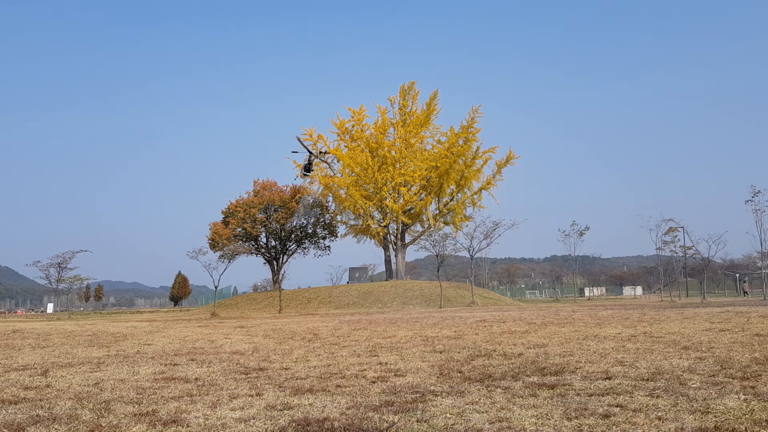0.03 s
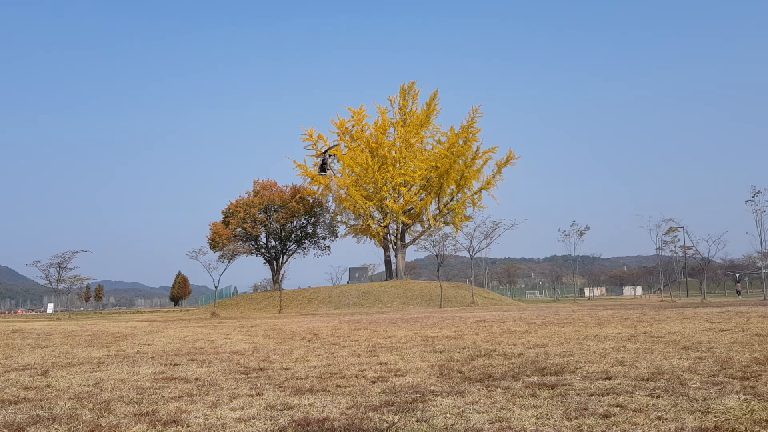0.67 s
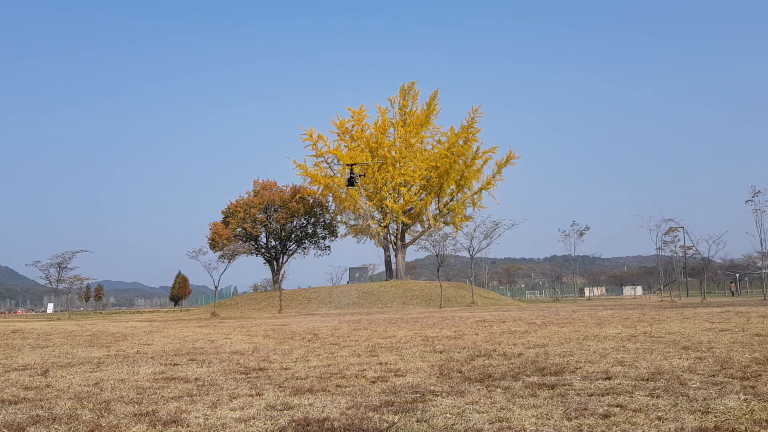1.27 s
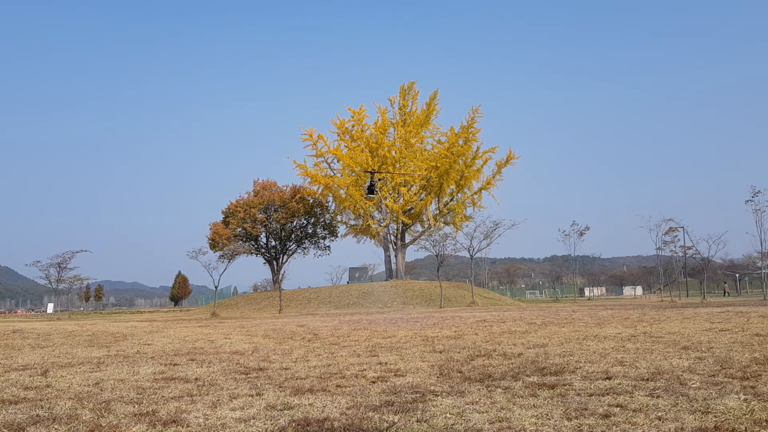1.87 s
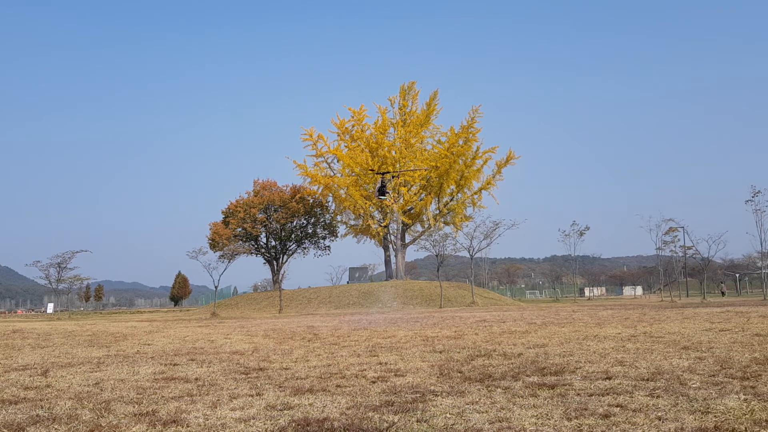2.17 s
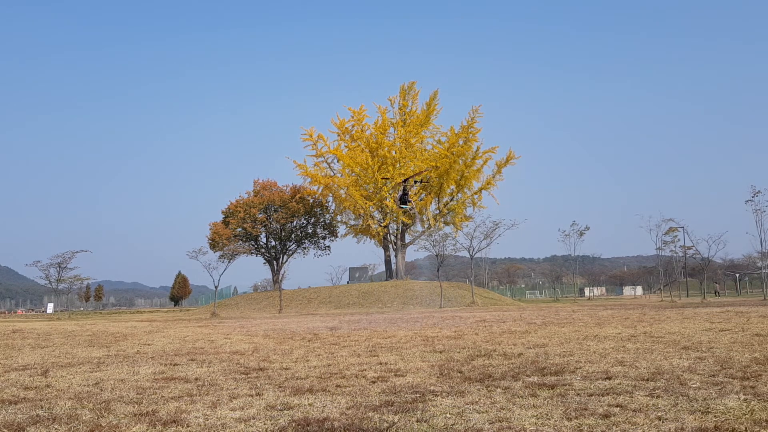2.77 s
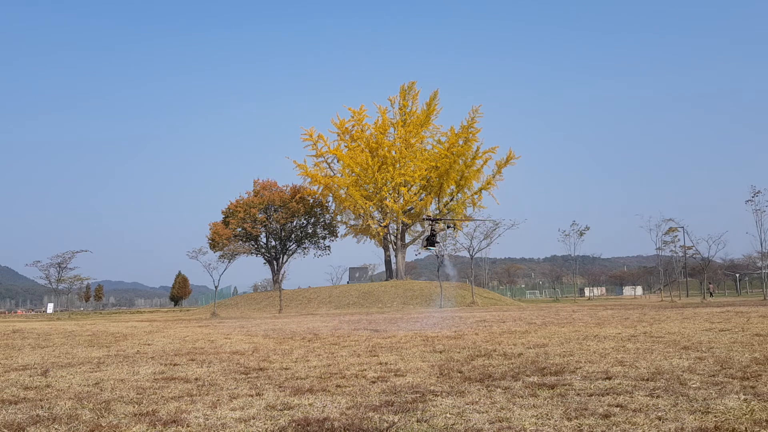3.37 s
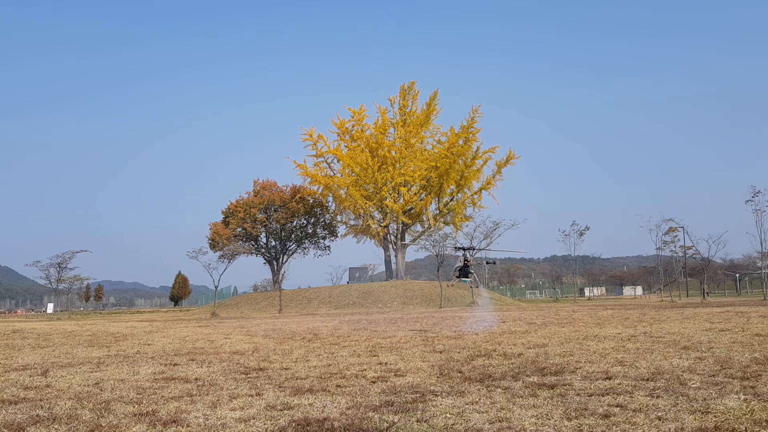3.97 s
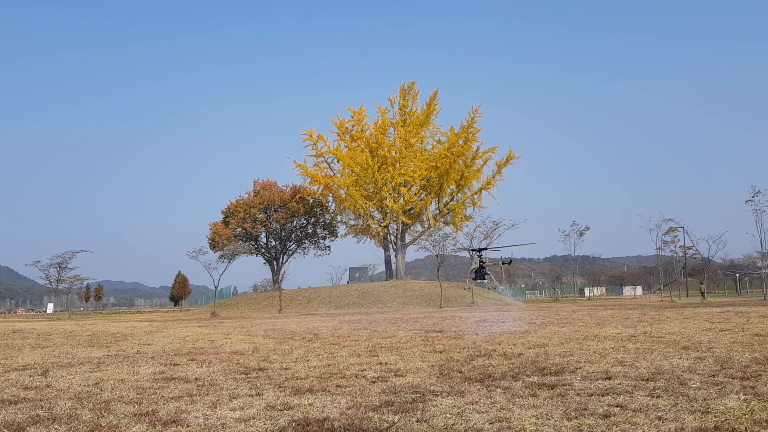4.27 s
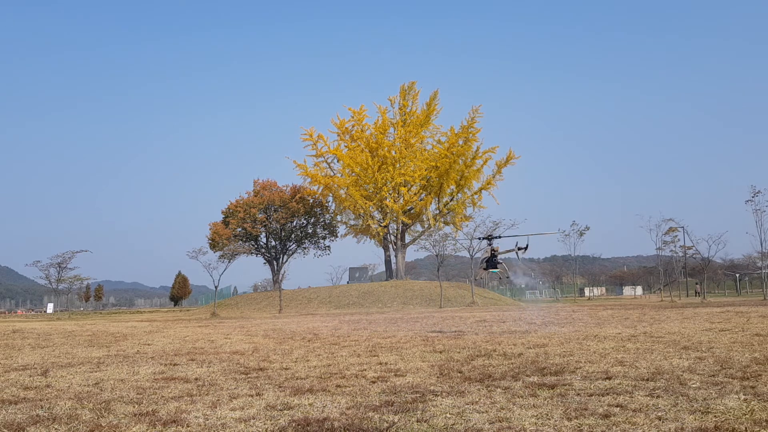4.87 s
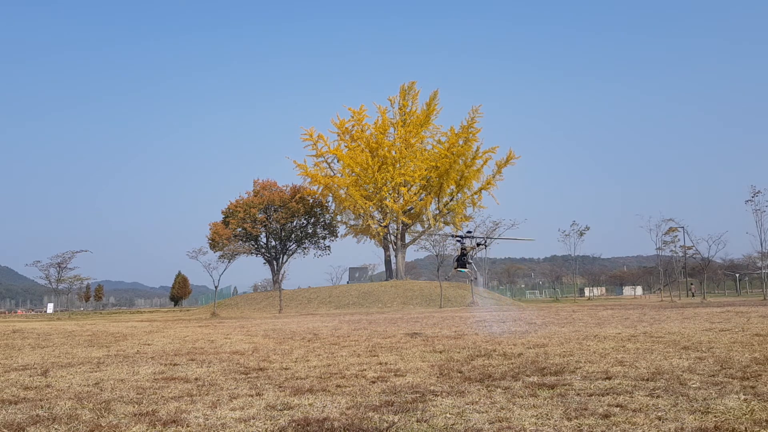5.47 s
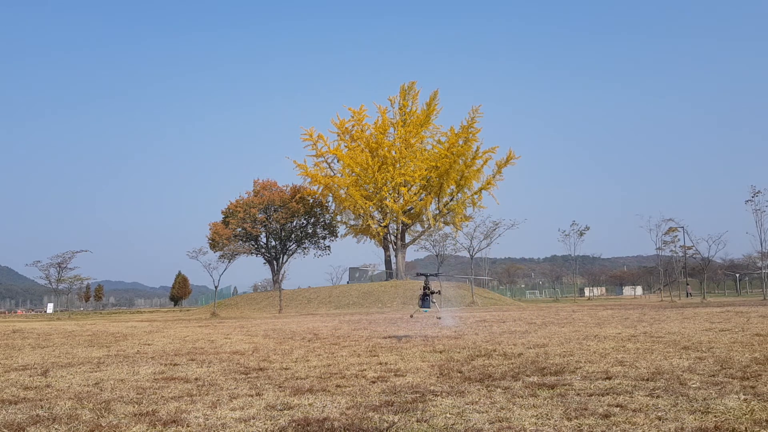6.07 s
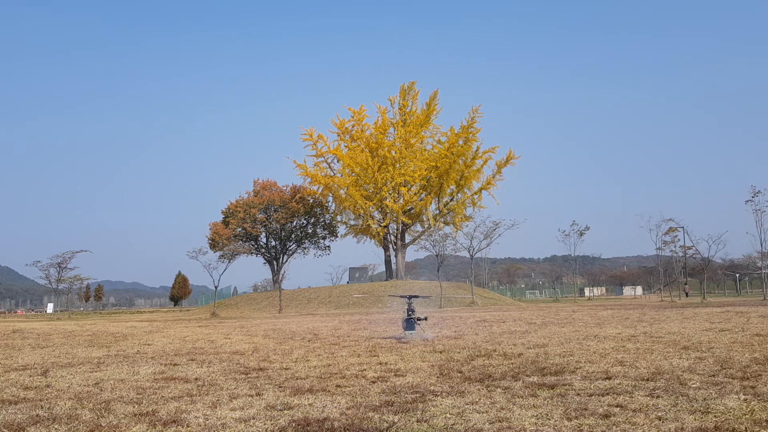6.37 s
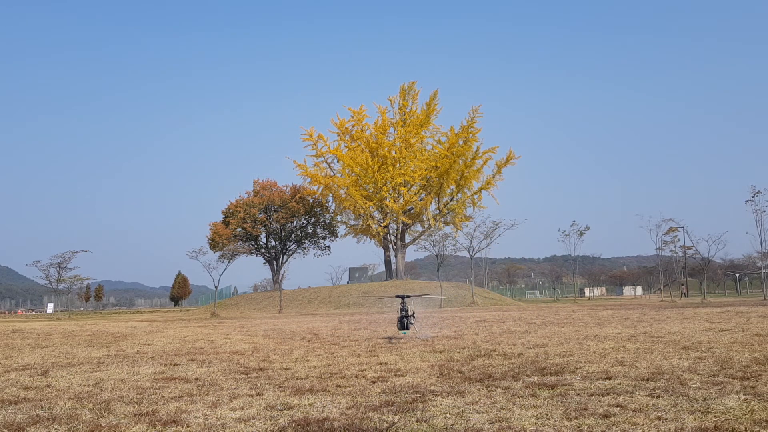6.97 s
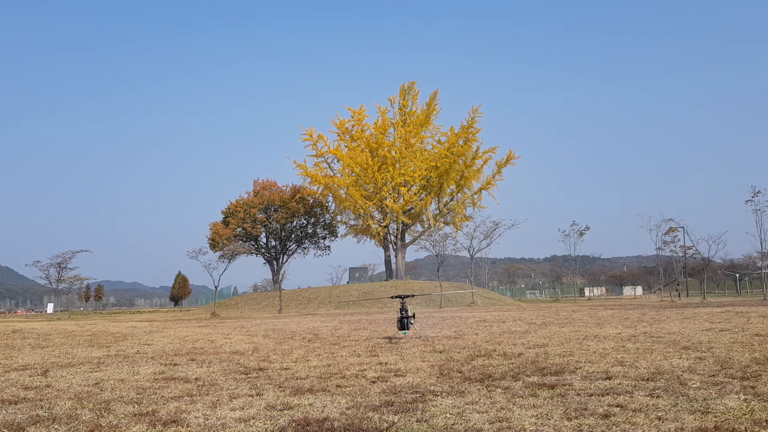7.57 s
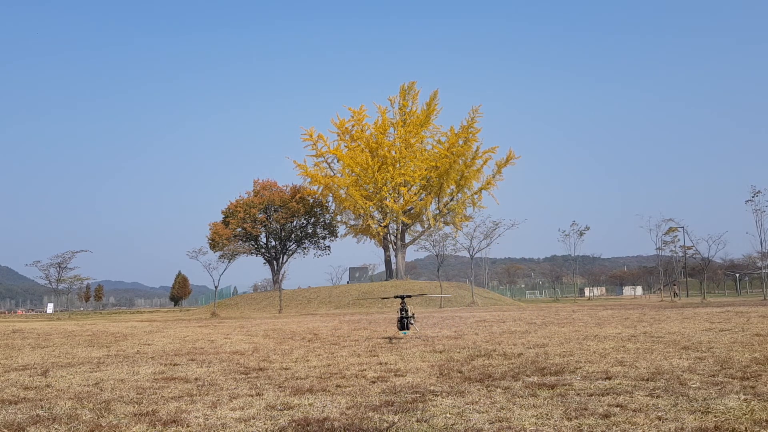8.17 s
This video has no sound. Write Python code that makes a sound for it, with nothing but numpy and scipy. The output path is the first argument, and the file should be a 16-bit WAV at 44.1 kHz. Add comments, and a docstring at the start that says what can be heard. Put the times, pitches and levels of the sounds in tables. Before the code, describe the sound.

The raspy engine drone and whirring rotors of a model helicopter hovering low, turning quieter and lower as it lands.

```python
"""A model helicopter landing on grass.

A small two-stroke helicopter hovers, sinks, lands and throttles down. Its exhaust is a pulse train
that hums and rasps through the muffler, every second firing weaker; rotors and gears are locked to
the crank. The ground echo shifts with height, and sideways drift moves the sound between two
microphones. Light air rumbles, and midway a soft knock rings the case that holds the microphones."""
import sys
import numpy as np
from scipy import signal
from scipy.fft import rfft, irfft, next_fast_len
from scipy.io import wavfile
from scipy.ndimage import map_coordinates

SR = 44100
rng = np.random.default_rng(int(sys.argv[2]) if len(sys.argv) > 2 else 0)


def unload_audio(sound):
    """Save the sound as a 16-bit wav file, at the path given as the first command line argument."""
    columns = np.transpose(np.atleast_2d(sound))
    # keep every value between -1 and 1, then stretch to whole-number steps
    steps = np.round(np.clip(columns, -1, 1) * 32767)
    wavfile.write(sys.argv[1], SR, steps.astype(np.int16))


N = 362061

# Loudness of the high hiss. Each row: time in seconds, level in dB.
HISS_LEVEL = [(0, -40), (.7, -43.5), (1.15, -42.5), (2.75, -38), (3.5, -43.5), (4.15, -39.5), (4.7, -37.5),
              (5.3, -39.5), (5.8, -42.5), (6.15, -43.5), (6.55, -40), (7.5, -42.5), (7.8, -38.5), (8, -41),
              (8.21, -40.5)]
# After touchdown the throttle eases, the blades flatten, the engine idles: start and length in seconds.
THROTTLE_BACK, BLADES_FLATTEN, THROTTLE_IDLE = (6.43, .3), (6.55, .6), (7.75, .4)
MAIN_PASSES_PER_TURN, TAIL_PASSES_PER_TURN = .2035, .947  # blade passes per crank turn


def amp(db):
    """Decibels as an amplitude ratio."""
    return 10 ** (np.asarray(db) / 20)

def unit(x):
    """Normalisation to rms 1."""
    return x / np.sqrt(np.mean(x ** 2) + 1e-20)

def along(points, hz):
    """Interpolation of (Hz, value) points on a logarithmic frequency axis."""
    f, v = np.transpose(points)
    return np.interp(np.log(hz + 1), np.log(f + 1), v)

def curves(rows):
    """Linear interpolation in time: one curve for each column after the seconds."""
    s, *cols = np.transpose(rows)
    return [np.interp(np.arange(N) / SR, s, c) for c in cols]

def ramp(start, length):
    """A linear rise from 0 to 1 over length seconds."""
    return np.clip((np.arange(N) / SR - start) / length, 0, 1)

def bell(middle, half):
    """A Gaussian swell from 0 to 1 and back."""
    return np.exp(-((np.arange(N) / SR - middle) / half) ** 2)

def wobble(rate, steps=8):
    """Smooth random modulation: a spline through rate knots a second."""
    knots = rng.standard_normal(int(N * rate / SR) + 4)
    fine = np.arange(len(knots) * steps) / steps
    return np.interp(np.arange(N) * (rate / SR), fine, map_coordinates(knots, [fine], mode="mirror"))

def filtered(x, response):
    """Linear filtering: the spectrum of x times a frequency response."""
    m = next_fast_len(N + SR // 4)
    return irfft(rfft(x, m) * response(np.fft.rfftfreq(m, 1 / SR)), m)[..., :N]

def coloured(x, points, size=4096):
    """Minimum-phase filtering by a (Hz, dB) response; the result has rms 1."""
    cepstrum = irfft(np.log(amp(along(points, np.fft.rfftfreq(size, 1 / SR)))))
    cepstrum[1:size // 2] *= 2
    cepstrum[size // 2 + 1:] = 0
    return unit(signal.oaconvolve(x, irfft(np.exp(rfft(cepstrum))))[:N])

def pulses(at, sizes):
    """Band-limited impulses: windowed sincs at fractional sample positions."""
    taps = np.floor(at)[:, None] + np.arange(-7, 9)
    offset = taps - at[:, None]
    clicks = np.sinc(offset) * np.sinc(offset / 8) * sizes[:, None]
    return np.bincount(np.clip(taps, 0, N).astype(int).ravel(), clicks.ravel(), N + 1)[:N]

def delayed(x, ms):
    """A time-varying propagation delay."""
    return map_coordinates(x, [np.arange(N) - ms * SR / 1000], order=3)

def puffs(cycles, depth, sharp):
    """Amplitude modulation: white noise that swells once a cycle."""
    swell = (.5 + .5 * np.cos(2 * np.pi * cycles)) ** sharp
    return unit(rng.standard_normal(N) * (1 + depth * swell))

def aspects(height, below_m=3.13, side_m=1.4, skim_m=1.3, ground_m=.18):
    """Directivity: weights for the craft heard from below, from the side and landed; they sum to 1."""
    below = np.clip((height - side_m) / (below_m - side_m), 0, 1)
    landed = np.clip((skim_m - height) / (skim_m - ground_m), 0, 1)
    return np.array([below, 1 - below - landed, landed])

def firing_pairs(turns):
    """Period doubling: a phase that is whole at each strong firing and slips a turn at random."""
    # Slips of the strong-weak pattern. Each row: time in seconds, mean slips per second.
    slip_rate = [(0, 11), (1.1, 9), (1.6, 2), (4.3, 3), (5.1, 18)]
    slips_per_s, = curves(slip_rate)
    return (turns + np.cumsum(rng.random(N) < slips_per_s / SR)) / 2

def muffler(cracks, rings, bounce, split_hz, round_trips_ms=(.504, 1.211)):
    """All-pass dispersion: two chambers smear the cracks (below split_hz) and rings (above) in time."""
    def chambers(hz):
        trips = np.exp(-2j * np.pi * np.outer(round_trips_ms, hz) / 1000)
        shares = bounce * np.array([[.5], [1]])
        return np.prod((1 - shares / trips) / (1 - shares * trips), axis=0)
    treble = lambda hz: .5 + .5 * np.tanh((hz - split_hz) / 70)
    return filtered(cracks + filtered(rings - cracks, treble), chambers)

def exhaust(turns, pairs, aspect, crack_scatter=.13, ring_scatter=.15):
    """Source and filter: each firing is a crack, a thud and a ring; rich running makes them alternate."""
    # Spectra of the rasp in each aspect, and of the thud. Each row: frequency in Hz, relative dB.
    from_below = [(900, -53.5), (1250, 3.5), (1400, 4), (1500, 6.5), (1780, 4), (2150, 0), (2500, -4),
                  (2850, 2.5), (3120, 0.5), (3450, -3.5), (3850, -3.5), (4150, -12.5), (4550, -10.5),
                  (5000, -8), (5600, -13), (7400, -15.5), (10000, -22.5), (13000, -29), (15500, -44)]
    from_side = [(900, -38), (1300, -34.5), (1500, -3.5), (1780, -3.5), (2270, 4), (2500, 1), (2750, 0.5),
                 (3050, 4), (3550, -5), (3850, -6.5), (4200, -18), (5300, -18.5), (7500, -18), (10000, -44)]
    when_landed = [(900, -35), (1080, 15), (1220, 0.5), (1440, 11.5), (1570, 5), (1750, 11.5), (1980, 7),
                   (2220, 3), (2400, 6.5), (2600, -2), (2950, 5.5), (3450, -2), (4100, 1.5), (5000, 2.5),
                   (10000, -35)]
    thud_spectrum = [(40, -32), (90, -3), (125, 5.5), (200, -9), (375, 7.5), (520, -18), (640, -4),
                     (780, -28), (880, -4), (1130, -4), (1400, -28), (3000, -21), (6500, -32),
                     (13000, -31.5)]
    # Loudness of the rasp. Each row: time in seconds, level in dB.
    rasp_level = [(0.1, -26.5), (.7, -26.8), (1.28, -28), (2.1, -26.5), (2.73, -24.5), (3.6, -25),
                  (4.3, -25.5), (4.94, -26), (5.18, -22.5), (5.74, -26), (5.98, -28.5), (6.23, -37.5),
                  (7.07, -45), (7.3, -42.5), (8.1, -42)]
    # Each triple: from below, from the side, landed.
    crack_limps, ring_limps, gas_shares = (.3, .1, .04), (.42, .33, .06), (.27, .15, .08)
    bounces, splits_hz, thuds_db = (.3, .3, .5), (2780, 2660, 2600), (-40, -35, -39)
    jitter_ms, sway_ms, late_ms_per_limp, crack_lead_ms, ring_lag_ms = .008, .024, .07, 1.7, .15

    at = np.interp(np.arange(1, int(turns[-1])), turns, np.arange(N))
    sample = at.astype(int)
    size_draw, time_draw = rng.standard_normal((len(at), 2)).T
    beat = np.cos(2 * np.pi * pairs[sample])  # +1 strong, -1 weak
    crack_limp, ring_limp = np.dot([crack_limps, ring_limps], aspect[:, sample])
    uneven = ring_limp * beat + ring_scatter * size_draw
    # Weak firings ignite late, and the crank sways under load.
    late_ms = jitter_ms * time_draw - late_ms_per_limp * crack_limp * beat + sway_ms * wobble(85)[sample]
    at = at + late_ms * SR / 1000
    cracks = pulses(at - crack_lead_ms * SR / 1000, 1 + crack_limp * beat + crack_scatter * size_draw)
    rings = pulses(at + ring_lag_ms * SR / 1000, 1 + uneven)
    gas = np.dot(gas_shares, aspect) * puffs(pairs, depth=.15, sharp=2.2)
    rasp, spectra = 0, (from_below, from_side, when_landed)
    for share, bounce, split_hz, spectrum in zip(aspect, bounces, splits_hz, spectra):
        rasp += share * coloured(unit(muffler(cracks, rings, bounce, split_hz)) + gas, spectrum)
    kicks = pulses(at, uneven / np.hypot(ring_limp, ring_scatter))
    thud = -unit(filtered(kicks, lambda hz: amp(along(thud_spectrum, hz))))
    thud_db = np.dot(thuds_db, aspect) - 13 * ramp(*THROTTLE_BACK)
    rasp_db, = curves(rasp_level)
    return amp(thud_db) * thud + amp(rasp_db) * rasp

def hum(turns, aspect, waver_db=.43, drift_db=.5, hunting_db=2.4):
    """Harmonics of the firing rate leave the muffler; the overtones falter as the throttle comes back."""
    # Each row: crank order, then level in dB from below, from the side, landed, throttled back, idling.
    harmonics = [(1, -34, -30.5, -31, -33, -40), (2, -35, -30.5, -28, -42, -46.5),
                 (3, -59, -46, -44, -43, -50), (4, -41.5, -32.5, -34, -48, -64),
                 (5, -53.5, -43, -41, -55, -50)]
    # Engine stumbles. Each row: middle in seconds, half length in seconds, overtone change in dB.
    stumbles = [(6.435, .022, -11), (6.705, .018, -8)]
    back, idle = ramp(*THROTTLE_BACK), ramp(*THROTTLE_IDLE)
    states = np.array([*(aspect * (1 - back)), back - idle, idle])
    stumble_db = sum(db * bell(s, half) for s, half, db in stumbles)
    tones = 0
    for order, *levels in harmonics:
        falter_db = (stumble_db + hunting_db * back * wobble(35)) * (order > 1)
        level_db = np.dot(levels, states) + falter_db + waver_db * wobble(25) + drift_db * wobble(1.73)
        tones -= amp(level_db) * np.cos(2 * np.pi * order * turns)
    return np.sqrt(2) * tones

def rotors(turns, waver_db=.65, flattened_db=-3.5):
    """Periodic blade loading radiates harmonics of the passing rate, weaker once the blades flatten."""
    # Rotor tones. Each row: multiple of that rotor's blade passing rate, level in dB.
    main_tones = [(1, -47), (2, -50.5), (3, -54.5), (4, -71), (6, -49.5), (7, -48.5)]
    tail_tones = [(1, -42.5), (2, -49.5), (3, -67), (4, -75)]
    tones = 0
    for ratio, lines in (MAIN_PASSES_PER_TURN, main_tones), (TAIL_PASSES_PER_TURN, tail_tones):
        for k, db in lines:
            tones += amp(db + waver_db * wobble(12)) * np.sin(2 * np.pi * k * ratio * turns)
    return np.sqrt(2) * amp(flattened_db * ramp(*BLADES_FLATTEN)) * tones

def downwash(turns, height, landed, db_per_m=-.12):
    """Turbulence: the main blades chop the air into a wash, and their tips swish while loaded."""
    # Spectra of wash and tip swish. Each row: frequency in Hz, relative level in dB.
    wash_spectrum = [(20, -50), (45, -1.5), (70, -1), (130, -5), (190, -6), (340, -5), (560, -3),
                     (680, -10), (1000, -8), (1350, -14.5), (3000, -46), (8000, -80)]
    swish_spectrum = [(400, -28), (900, -8), (1350, -9), (3000, -6.5), (8000, -42)]
    flattened, passes = ramp(*BLADES_FLATTEN), MAIN_PASSES_PER_TURN * turns
    gust_db = (.8 + 1.3 * landed) * wobble(15)  # air recirculating off the ground gusts harder
    wash = coloured(puffs(passes, depth=.62, sharp=6.2), wash_spectrum)
    swish = coloured(puffs(passes, depth=.33, sharp=3.7), swish_spectrum)
    wash_db, swish_db = -39.5 - 2.8 * flattened + gust_db, -42 - 10 * flattened
    return amp(db_per_m * height) * (amp(wash_db) * wash + amp(swish_db) * swish)

def gear_rattle(turns, pairs, aspect, right, db_per_m=1.17):
    """Modulated noise: the gears rattle with each turn and strong firing, louder toward the right."""
    # Spectrum of the rattle. Each row: frequency in Hz, relative level in dB.
    spectrum = [(1500, -12), (3800, 5), (4500, 2), (5350, 3), (5750, 1), (6300, -1), (6950, -9),
                (7400, -13), (8400, -3.5), (10000, -32), (14000, -20)]
    impacts = puffs(turns, depth=.11, sharp=3.8) + .66 * puffs(pairs, depth=5.6, sharp=10)
    level_db = np.dot((-39.5, -36.7, -45), aspect) + db_per_m * right
    return amp(level_db) * coloured(impacts, spectrum)

def high_hiss(turns, dulling):
    """Modulated noise: a high hiss pulses once a crank turn; its top end sounds duller late on."""
    # Spectra of the hiss. Each row: frequency in Hz, relative level in dB.
    brighter = [(5000, -17), (8000, -2), (9400, -1.5), (10500, 5), (11300, -5.5), (11900, 7.5),
                (13400, 3.5), (14200, -1), (15200, -7), (15800, -13)]
    duller = [(5000, -13), (8000, -5), (9900, 0), (10600, 5), (11000, -2), (11400, 8), (11900, 1),
              (12600, 4), (13500, -1), (14400, -12), (15500, -20)]
    noise = puffs(turns, depth=.88, sharp=2.5)
    hiss_db, = curves(HISS_LEVEL)
    return amp(hiss_db) * ((1 - dulling) * coloured(noise, brighter) + dulling * coloured(noise, duller))

def gear_resonances(pairs):
    """Directional radiation: a sizzle and a narrow ring swell at the times the gears face the listener."""
    # Spectra of the sizzle and the main gear's ring. Each row: frequency in Hz, relative level in dB.
    sizzle = [(5500, -23), (6800, -7), (7400, 0), (7900, -2), (8700, -36), (11000, -40)]
    ring = [(5500, -53), (6150, -13), (6380, 2), (6480, -5), (6620, 2), (6900, -19), (7600, -42)]
    # Their swells. Each row: middle in seconds, half length in seconds, greatest level in dB.
    sizzle_swells = [(1.3, 1, -44), (4.3, 0.36, -34.5)]
    ring_swells = [(1.55, 1.5, -40.5), (3.45, 0.43, -46), (6.35, 0.5, -46.5)]
    bands = 0
    for spectrum, swells in (sizzle, sizzle_swells), (ring, ring_swells):
        envelope = sum(amp(db) * bell(s, half) for s, half, db in swells)
        bands += envelope * coloured(puffs(pairs, depth=.63, sharp=1), spectrum)
    return bands

def whine(turns, flutter_per_order=.65 / 20, waver_db=.5):
    """Gear and fan tones, modulated in phase by backlash and in amplitude by each crank turn."""
    # Each row: crank order, greatest level in dB, start in seconds, end in seconds.
    partials = [(9, -39.5, 3, 5.5), (7, -46, 6.1, 7.4), (9, -48.5, 6.1, 7.7), (12, -43, 6.7, 7.7),
                (6, -48, 6.7, 7.7), (10, -54, 6.4, 7.8), (12, -49, 7.35, 8.6), (13, -49, 7.5, 8.1),
                (16, -51, 7, 8), (17, -52, 6.6, 7.4), (17, -50, 7.6, 8.1), (18, -50, 7, 7.75),
                (18, -44, 7.55, 8.35), (24, -50, 7.3, 8.1), (53, -45, 6.6, 8.1), (54, -47, 7.3, 8),
                (8, -52, 7.5, 8.3), (6, -42, 7.75, 8.5), (26, -45, -0.4, 0.9), (25, -45.5, 0.6, 1.9),
                (26, -42, 0.8, 3.3), (27, -47, 1, 1.9), (26, -41, 3.1, 3.9), (51.5, -44.5, 1.3, 3.2),
                (21, -48.5, 5.6, 6.8)]
    backlash = wobble(70) + .5 * wobble(400)
    tones = 0
    for order, db, start, end in partials:
        swell = np.sin(np.pi * ramp(start, end - start))
        phase = order * (2 * np.pi * turns + flutter_per_order * backlash)
        tones += amp(db + waver_db * wobble(37)) * swell * np.sin(phase)
    return unit(1 + .044 * np.cos(2 * np.pi * turns)) * np.sqrt(2) * tones

def with_ground_echo(x, height, aspect, ms_per_m=.1416, grass_hz=7040):
    """Comb filtering: x plus its reflection off the grass; the notches rise as the craft sinks."""
    dulled = filtered(x, lambda hz: 1 / (1 + (hz / grass_hz) ** 8))
    gain = np.dot((.57, .12, .06), aspect)
    return (x + gain * delayed(dulled, ms_per_m * height)) / np.hypot(1, gain)

def field_scatter(x, t60=.19):
    """Diffuse scattering from grass and trees gives each microphone its own short, bright tail."""
    t = np.arange(SR // 4) / SR
    tail = rng.standard_normal((2, len(t))) * amp(-60 * t / t60)
    wet = signal.oaconvolve(x[None], tail / np.linalg.norm(tail[0]), axes=1)[:, :N]
    # Each row: frequency in Hz, gain in dB.
    response = [(300, -45), (1000, -10), (3000, -5.5), (6000, -5.5), (11000, 0)]
    return filtered(wet, lambda hz: amp(along(response, hz)))

def air(rumble_db=-56, diffuse_db=-3):
    """Uncorrelated noise at the two microphones: light air rumbles, and hiss arrives from all around."""
    # Each row: frequency in Hz, relative level in dB.
    rumble = [(20, -5), (50, -10), (120, -7), (400, -17), (2000, -34)]
    diffuse = [(2000, -1), (4500, .5), (7500, 8.5), (9400, -10), (10500, 1), (11200, 6.5),
               (12300, -11), (13500, -11), (14000, -21), (15800, -17)]
    pair = lambda spectrum: np.array([coloured(noise, spectrum) for noise in rng.standard_normal((2, N))])
    hiss_db, = curves(HISS_LEVEL)
    return amp(rumble_db) * pair(rumble) + amp(hiss_db + diffuse_db) * pair(diffuse)

def case_knock(rise_s=.011):
    """Damped modes: a soft knock briefly rings the case that holds the microphones."""
    # Each row: start in seconds, gain in dB.
    knocks = [(4.536, -16.5)]
    # Each row: frequency in Hz, relative level in dB, seconds to decay by 60 dB.
    case_modes = [(88, -6, 0.13), (126, 4, 0.1), (204, 4, 0.07), (268, -6.5, 0.28)]
    out = np.zeros(N)
    for start, db in knocks:
        t = np.maximum(np.arange(N) / SR - start, 0)
        ring = sum(amp(level - 60 * t / t60) * np.sin(2 * np.pi * hz * t) for hz, level, t60 in case_modes)
        out += amp(db) * ring * (1 - np.exp(-t / rise_s))
    return out

def scene():
    """Superposition: the craft's sources add, and a difference in arrival time gives their direction."""
    # Engine speed. Each row: time in seconds, crank turns per second.
    crank_speed = [(0, 255.1), (.55, 252.5), (1.1, 251.4), (1.45, 252.1), (2, 249.4), (2.66, 246.2),
                   (3, 249.7), (3.45, 251.6), (3.8, 252), (4.25, 250.7), (5.05, 252.7), (5.9, 251.1),
                   (6.45, 248.5), (6.82, 248.7), (7.3, 239.1), (7.8, 230.3), (8.21, 213.8)]
    # Each row: time in seconds, height in metres, distance to the right in metres.
    flight_path = [(0, 3.5, -1.83), (1.2, 3.24, -1.5), (2.75, 3.03, 0.86), (3.5, 2.33, 0.7), (4.3, 1.74, 2),
                   (5.1, 2.2, 2.5), (5.8, 2.02, 0.85), (6.2, 0.71, 0.4), (6.6, 0.11, 0.2), (8.21, 0.26, 0)]
    speed, = curves(crank_speed)
    height, right = curves(flight_path)
    turns, aspect = np.cumsum(speed) / SR, aspects(height)
    pairs, landed = firing_pairs(turns), aspect[2]
    gears = gear_resonances(pairs)
    rush = exhaust(turns, pairs, aspect) + gear_rattle(turns, pairs, aspect, right)
    rush += high_hiss(turns, dulling=landed) + downwash(turns, height, landed)
    tones = hum(turns, aspect) + rotors(turns) + whine(turns)
    craft = with_ground_echo(rush, height, aspect) + gears + tones
    left_lag_ms = .021 + .028 * right
    stereo = np.array([delayed(craft, left_lag_ms / 2), delayed(craft, -left_lag_ms / 2)])
    return stereo + field_scatter(craft) + air() + case_knock()

def record(dry, top_hz=15800):
    """Frequency response: both microphones are band-limited, and the left is a little louder."""
    # Each row: frequency in Hz, left minus right level in dB.
    balance = [(60, -0.5), (110, 1.5), (200, 0.5), (380, 1.5), (700, 4), (1290, 2), (2380, 1), (4400, 2.5),
               (8120, -0.5), (15000, 0.5)]
    return filtered(dry, lambda hz: amp(np.outer([.5, -.5], along(balance, hz))) * (hz < top_hz))

dry = scene()
out = record(dry)
unload_audio(out)
```